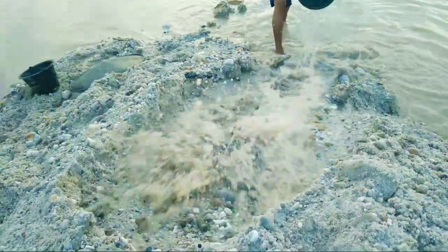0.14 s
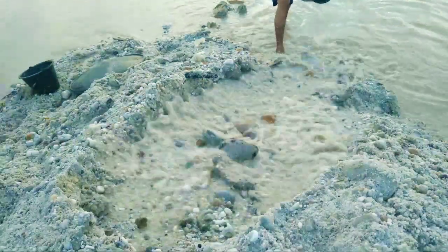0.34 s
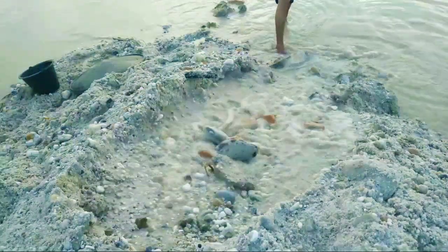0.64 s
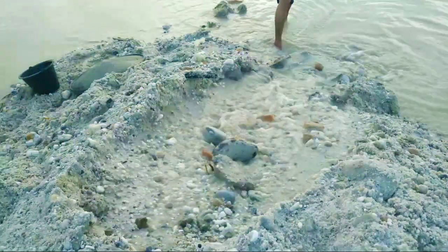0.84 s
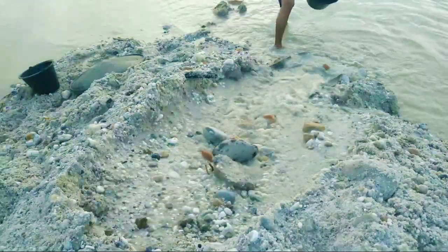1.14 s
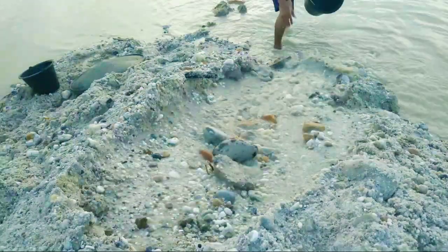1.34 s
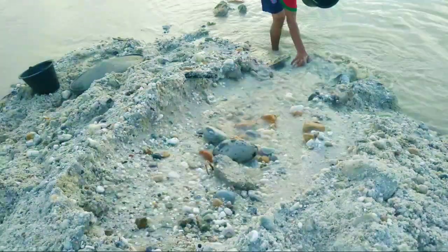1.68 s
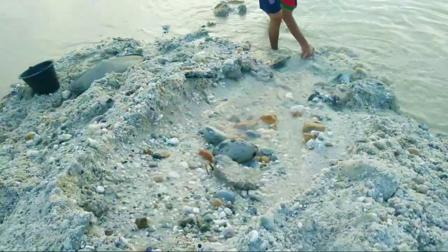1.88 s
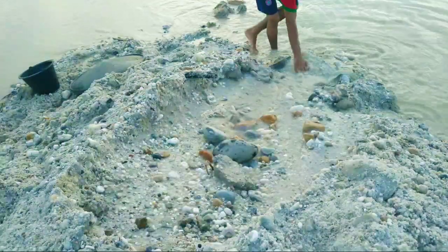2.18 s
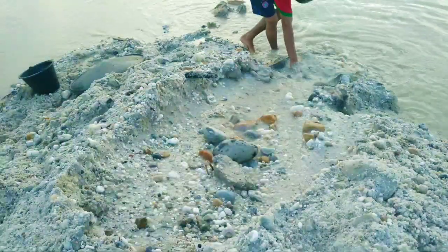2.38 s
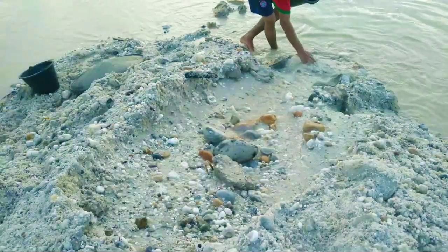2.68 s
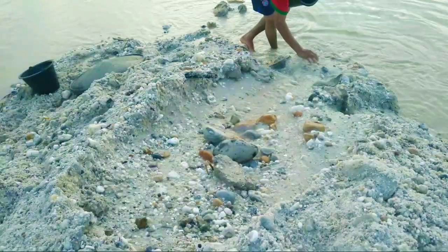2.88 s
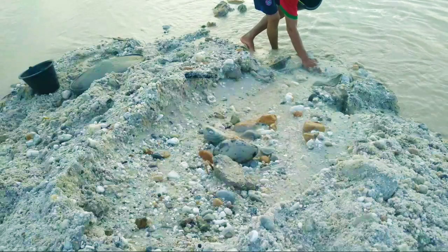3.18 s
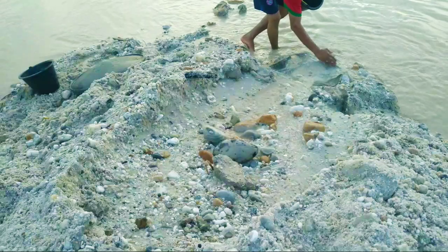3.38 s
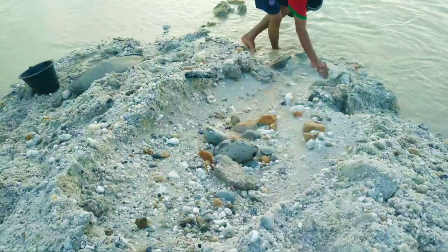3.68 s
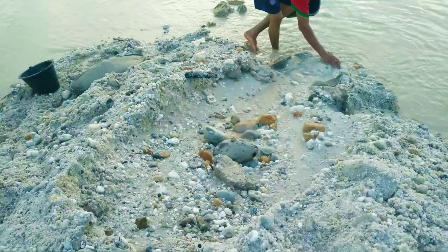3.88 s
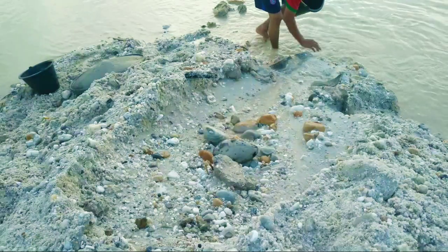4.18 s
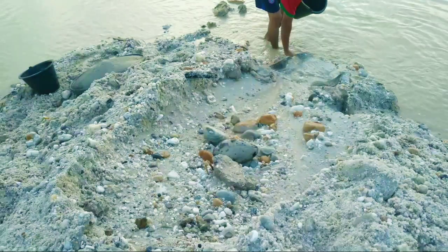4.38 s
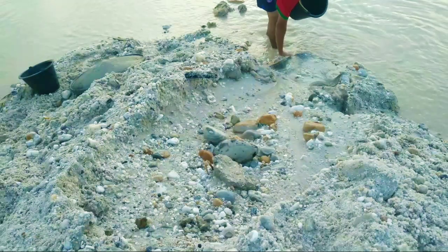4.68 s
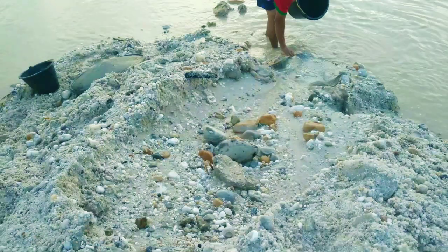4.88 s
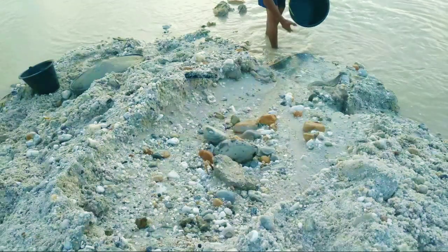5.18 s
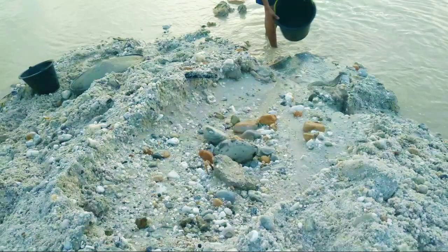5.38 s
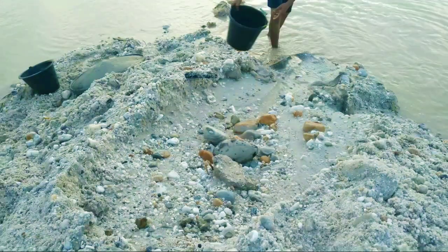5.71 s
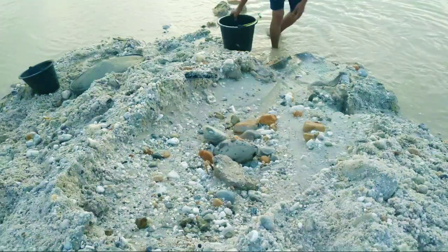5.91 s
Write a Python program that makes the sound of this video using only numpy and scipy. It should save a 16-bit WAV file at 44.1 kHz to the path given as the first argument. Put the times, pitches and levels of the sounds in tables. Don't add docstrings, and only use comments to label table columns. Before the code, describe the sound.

Bright splash on pebbles, trickling and small bubbles, scattered grit clicks, far-off engine blips throughout, and finally a hollow bucket knocking and crunching on stones.

```python
import sys
import numpy as np
from scipy import signal
from scipy.io import wavfile
from scipy.ndimage import uniform_filter1d

SR = 44100
rng = np.random.default_rng(int(sys.argv[2]) if len(sys.argv) > 2 else 0)


def undo_db(level):
    steps = np.asarray(level, float) / 20
    return 10 ** steps


def to_wav(sig):
    pcm = np.clip(np.atleast_2d(sig), -1, 1) * 32767
    pcm = np.round(pcm).astype(np.int16)
    wavfile.write(sys.argv[1], SR, pcm.T)


N = 266804
STEP = 32

# t/s, spray level/dB, coarse patter over the spray/dB
SPLASH = [
    (0.0, -20, -14),
    (0.01, -21, -8.5),
    (0.18, -24, -26),
    (0.3, -43.5, -7),
    (0.34, -39.5, -18),
    (0.4, -49.5, -12),
    (.6, -66, -10),
    (1.2, -110, -10),
]
SPLASH_TOP_DB = 2.5
# f/Hz, density level/dB per Hz
FINE_SPECTRUM = [(2500, -39.5), (3600, -22), (4700, -15), (5400, -6.5), (7000, -4.5), (8500, 3),
                 (9600, -5.5), (11000, -10.5), (14600, -15.5), (15800, -23)]
# f/Hz, density level/dB per Hz
COARSE_SPECTRUM = [(880, -12), (1500, -1), (3300, -3.5), (3620, -5.5), (3950, -5), (4720, -10),
                   (5500, -13.5), (7150, -65), (12100, -120)]
# t/s, flow level/dB
FLOW = [(0, -51), (.45, -51), (.72, -54.5), (1.3, -53), (1.7, -49.5), (2.11, -51), (2.66, -60.5),
        (3.2, -66), (3.8, -69), (4.5, -76), (5.55, -88), (5.7, -95), (5.8, -60), (6.05, -64)]
FLOW_COARSE_DB, FLOW_TOP_DB = -10.5, .1
FLOW_GURGLE_DB, GURGLE_PER_FLOW = -67, .9
# peak t/s, level/dB, 20 dB fade t/s, coarse part/dB, top octave/dB
STIRS = [(1.48, -46, .2, -12, 0), (1.63, -48, .2, -4, 0), (2.04, -46, .2, -16, 0), (2.83, -53, .2, -13, 0),
         (3.02, -60, .3, -15, 0), (3.25, -53.5, .15, -40, -10), (3.35, -52, .1, -8, -15),
         (3.41, -41, .13, -22, -24), (3.86, -41, .1, -23, -5), (3.9, -40, .12, -23, -5),
         (4.55, -43, .075, -25, -3), (5.945, -44, .08, -19, -8)]
# peak t/s, level/dB, 20 dB fade t/s, coarse part/dB, top octave/dB
CRUNCHES = [
    (5.64, -41, .03, 4, -4),
    (5.66, -48, .3, -24, -4),
    (5.735, -44, .05, -3, -4),
    (5.75, -36.5, .14, -17, -4),
]
STIR_RISE, CRUNCH_RISE = .5, .12

# t/s, peak level/dB, f/Hz, left over
# right/dB
TICKS = [(0.2645, -22.5, 6900, -17.5), (0.3168, -22, 7000, -9), (0.875, -33.5, 8200, -4.5),
         (1.456, -29, 8100, 5.5), (1.632, -20, 7700, -4), (1.71, -26, 7300, -7), (1.8205, -27, 7140, -11),
         (1.928, -27.5, 5870, -3.5), (2.036, -21, 8610, 4), (2.09, -30.5, 7810, -2.5),
         (2.5053, -30.5, 6960, -5.5), (2.732, -28, 7900, 1), (3.023, -30.5, 8690, 7),
         (3.244, -29.5, 8140, 8.5), (3.3333, -40, 8000, 4), (3.315, -40, 8290, 3), (3.364, -31, 7900, 2.0),
         (3.395, -32, 7800, -2), (3.6596, -41, 8080, -7), (3.8501, -25, 8600, 2), (4.52, -44, 8300, 2),
         (4.5466, -23, 8650, 3), (5.6374, -11.5, 8215, 0), (5.7354, -16, 8700, -1.5),
         (5.7923, -26, 8500, 1.5), (5.9389, -21, 8500, -0.5),
         (0.0624, -11, 8800, -2.5),
    (0.1366, -9, 8800, -3.5),
    (0.185, -16.5, 8180, -4.5),
]
# t/s, peak level/dB, f/Hz, bandwidth/Hz
KNOCKS = [(.0165, -8, 1050, 500), (.0167, -11, 2900, 1800), (.046, -26, 1300, 600), (.233, -36, 950, 150),
          (.245, -36, 1650, 200), (.283, -33, 1200, 300), (.366, -43, 1260, 200), (.423, -46, 899, 150),
          (1.296, -49, 1500, 150), (1.403, -39, 587, 80), (1.606, -33, 1600, 700), (1.632, -28, 1500, 500),
          (1.66, -36, 850, 100), (1.715, -39, 1550, 150), (1.75, -38, 830, 70), (1.817, -41, 694, 80),
          (1.86, -40, 760, 70), (1.904, -43, 791, 90), (1.945, -40, 902, 90), (2.053, -46, 1210, 120),
          (2.504, -48, 900, 150), (2.733, -48, 1500, 300), (2.811, -42, 1900, 400), (4.132, -56, 2000, 800),
          (5.552, -52, 640, 60), (5.555, -52, 1800, 150), (5.636, -24, 1550, 250), (5.647, -20, 1050, 130),
          (5.656, -27, 1180, 180), (5.729, -21, 2060, 200), (5.73, -24, 1350, 250), (5.737, -18, 1320, 150),
          (5.748, -23, 1400, 200), (5.754, -28, 1300, 200), (5.761, -23, 1900, 180), (5.832, -45, 1350, 80),
          (5.908, -40, 1800, 120), (5.92, -44, 800, 120), (5.929, -43, 720, 90), (5.815, -44, 1600, 250),
          (5.8, -40, 720, 90), (5.741, -27, 800, 200), (5.765, -30, 750, 150), (5.66, -36, 750, 60),
          (5.93, -50, 1850, 150), (5.948, -46, 980, 120), (5.948, -44, 330, 60), (6.03, -48, 330, 40)]
# t/s, peak level/dB, f/Hz
BUBBLES = [(.205, -33, 923), (.274, -47, 824), (.391, -46, 860), (.504, -46.5, 897), (.885, -48.5, 980),
           (1.357, -44, 880), (1.427, -32, 930), (1.57, -43, 900), (1.585, -40, 680), (1.6, -38, 900),
           (1.633, -23, 980), (1.69, -38, 960), (1.796, -45, 1080), (1.842, -39, 800), (1.933, -42.5, 1650),
           (2.194, -38.5, 808), (2.212, -30.5, 940), (2.257, -46, 1065), (2.477, -46, 897),
           (2.686, -45, 844), (2.84, -45.5, 600), (3.398, -33.5, 2350), (3.726, -51, 625),
           (3.844, -49.5, 1144), (3.855, -43, 2020), (5.549, -48.5, 1360)]
RING_CYCLES, RING_DB_PER_DB = 34, -.15
# t/s, length t/s, level/dB, centre f/Hz, bandwidth/Hz
SCUFFS = [(0.015, 0.006, -30, 6000, 8000), (1.6325, .003, -36, 6000, 11000),
          (3.022, .003, -46, 10000, 11000), (3.243, .004, -49, 9000, 9000), (3.333, .004, -46, 6000, 5000),
          (5.947, .004, -44, 5500, 3000), (.205, .006, -40, 2500, 3500), (3.352, .03, -44, 7500, 4000),
          (3.402, .005, -32, 8000, 2500), (3.835, .03, -42, 7500, 4000), (3.871, .005, -33, 7600, 2500),
          (3.89, .012, -35, 8000, 4000), (3.983, .004, -50, 8000, 7000), (1.454, 0.058, -41, 6600, 2430),
          (2.035, 0.033, -35, 8450, 1440), (2.802, 0.048, -44, 6800, 1900), (3.025, .06, -65, 13600, 3000),
          (3.391, 0.011, -34, 7650, 2460), (4.153, 0.041, -61, 3600, 5000), (4.736, 0.02, -64, 9360, 3000),
          (2.96, 0.063, -57.5, 4200, 5860), (4.313, 0.018, -66, 1200, 300),
          (3.728, 0.027, -58.5, 2480, 2970), (5.532, 0.038, -54.5, 2500, 4460)]

# peak t/s, level/dB, 20 dB rise t/s, 20 dB fade t/s
SLOSHES = [(.012, -27, .04, .13), (.2, -47, .2, .5), (.28, -38.5, .02, .1), (.5, -57, .3, 1.5),
           (1.44, -39.5, .17, .17), (1.645, -37, .09, .06), (1.69, -38, .06, .3), (1.86, -46, .2, .1),
           (1.94, -51, .05, .8), (2.85, -54, .16, .13), (3.37, -64.5, .17, .17), (3.72, -55, .02, .25),
           (4.16, -70, .1, .25), (5.56, -57, .025, .05), (5.93, -57, .06, .07)]
# f/Hz, density level/dB per Hz
SLOSH_SPECTRUM = [(240, -18), (400, 1), (731, 2), (797, 9), (977, 8), (1180, 6), (1660, 3), (2600, -1),
                  (3380, -30), (5720, -120)]

# t/s, peak level/dB, tub f/Hz, rim click over the boom/dB, grit over the boom/dB
BUMPS = [(5.635, -21.5, 427, -3, -21), (5.64, -15.5, 361.6, -9, -9), (5.646, -26.5, 270, 0, 1),
         (5.654, -24, 303, -5, -21), (5.667, -43, 328, 4, -12), (5.721, -32, 250, -40, -40),
         (5.728, -8, 359, -14, -25.5), (5.7375, -8, 343.7, -16, -21), (5.749, -17, 345, -12, -12),
         (5.7605, -7, 326.6, -20, -15), (5.777, -39, 262, -28, -9), (5.794, -31.5, 269, -30, -5),
         (5.811, -29.5, 344, -15, -21.5), (5.831, -27.5, 324, -11, -19), (5.852, -35, 361, -18, -15),
         (5.909, -63.5, 250, 14, 7.5), (5.924, -52, 259, -5, -12)]
# share of tub f, bandwidth/Hz, level/dB
TUB_MODES = [(0.85, 12, -9), (1, 20.9, -14)]
# f/Hz, bandwidth/Hz, level/dB
RIM_MODES = [(756, 150, -6), (1080, 140, -1), (1344, 270, 8), (1820, 280, 2.5)]

# t/s, firing rate/Hz
FIRING_RATE = [(0, 26.86), (.45, 20.55), (.83, 24.05), (1.27, 17.09), (1.57, 15.59), (2.06, 21.3),
               (2.35, 17.91), (2.66, 25.35), (3.03, 19.92), (3.25, 28.26), (3.74, 16.82), (4.2, 25.91),
               (4.47, 26.27), (4.89, 23.06), (4.9, 26.09), (5.25, 20.38), (5.6, 16.2), (6.05, 13.95)]
FIRST_TURN = .383
# start t/s, length t/s, boom at opening/dB, boom at closing/dB, upper modes over the boom/dB
BLIPS = [(-.05, .38, -34, -39, -13), (.48, .05, -36, -35, -17), (.53, .12, -32, -29.5, -13),
         (.66, .28, -34, -37, -13), (1.12, .2, -46, -43, -13), (1.47, .3, -36.5, -34, -13),
         (1.77, .33, -35, -33.5, -13), (2.28, .08, -45, -43, -13), (2.385, .16, -33, -31.5, -16),
         (2.62, .23, -31, -36.5, -10), (3.01, .04, -35, -33, -11), (3.06, .16, -29, -33, -12),
         (3.26, .09, -41, -43, -1), (3.38, .25, -42, -46, -15), (3.8, .16, -32, -36, -12),
         (3.97, .46, -36, -33, -14), (4.43, .33, -33, -37, -14), (4.76, .34, -37, -41.5, -16),
         (5.23, .11, -39, -44, -11), (5.5, .6, -44, -47, -13)]
IDLE_DB, IDLE_SHARP_DB, OPEN_DB_PER_S, SHUT_DB_PER_S = -49, -15, 400, 150
SHARP_PER_BOOM = .3
# f/Hz, bandwidth/Hz, level/dB
BOOM_MODES = [(54, 6, -31), (150, 19, 0), (182, 22, -12)]
# f/Hz, bandwidth/Hz, level/dB
BARK_MODES = [(325, 36, 5), (305, 20, -6), (445, 40, -7)]
BOOM_RISE_S, BARK_RISE_S = .012, .0052
GLIDE, GLIDE_S = .42, .011
UNEVEN_DB, WANDER = 1.4, .015
PAN_DB, PAN_PER_BOOM, DRIFT_DB_PER_S = -3.3, .25, 1.1

# f/Hz, density level/dB per Hz
HISS_SPECTRUM = [(400, -6), (1050, -9), (1350, 1), (1900, -13), (2750, -10), (3400, -16), (4400, -18),
                 (5500, -16), (7200, -15), (7900, -1), (8350, 0), (8800, -11), (11300, -22), (15700, -26)]
HISS_DB = -64.5
# peak t/s, level/dB, 20 dB fade t/s
GUSTS = [
    (.1, -51, 1),
    (.68, -52, .25),
    (.89, -51, .15),
    (1.77, -52, .4),
    (2.46, -48, .3),
    (2.6, -51, .9),
    (3.2, -45, .2),
    (4.0, -48, .2),
    (4.41, -44, .2),
    (5.66, -44, .2),
]
CALM_DB, GUST_RISE = -62, .7
# f/Hz, density level/dB per Hz
RUMBLE_SPECTRUM = [(15, -23.5), (25, -18), (46, -10.5), (81, -14), (100, -9), (130, -27.5), (220, -120)]


def spray():
    level, low, top = map(spread, grit_levels())
    fine = colour(patchy(patter(3500, 4.0, 0.54), 2.0, bins=15, frames=3.6), FINE_SPECTRUM)
    body = signal.oaconvolve(fine, signal.firwin(63, 11000, fs=SR)[None], "same")
    top_octave = fine - body
    coarse = undo_db(5.0) * colour(patchy(patter(1200, 3.6, 0.8), 2.1), COARSE_SPECTRUM)
    return undo_db(-0.68) * flicker(90, 0.78) * (level * body + top * top_octave + low * coarse)


def grit_levels():
    splash_db, coarse_db = curves(SPLASH)
    flow = undo_db(curves(FLOW)[0])
    parts = [(undo_db(splash_db), coarse_db, SPLASH_TOP_DB), (flow, FLOW_COARSE_DB, FLOW_TOP_DB)]
    for rows, share in ((STIRS, STIR_RISE), (CRUNCHES, CRUNCH_RISE)):
        for s, db, fade, low_db, top_db in rows:
            parts.append((swells([(s, db, share * fade, fade)]), low_db, top_db))
    fine = sum(level ** 2 for level, low_db, top_db in parts)
    coarse = sum((level * undo_db(low_db)) ** 2 for level, low_db, top_db in parts)
    top = sum((level * undo_db(top_db)) ** 2 for level, low_db, top_db in parts)
    return [np.sqrt(power) for power in (fine, coarse, top)]


def patter(per_s, spread_db, smooth):
    hits = (evened(clicks(per_s, spread_db, channels=3)) + smooth) * rng.standard_normal((3, N))
    placed = sum(ports(row, lag) for row, lag in zip(hits, (-7, -5, 1)))
    return placed + 0.85 * rng.standard_normal((2, N))


def drops():
    out = np.zeros((2, N))
    t = np.arange(300) / SR
    for s, db, hz, pan_db in TICKS:
        tick = ring([(hz, 800, 0), (8400, 1200, -5)], 300 / SR)
        tick = tick * (1 - np.exp(-t / .00028)) ** 2
        add(out, s, ports(undo_db(db + 14.0) * tick, -3.5, pan_db))
    t = np.arange(round(.05 * SR)) / SR
    for s, db, hz, width in KNOCKS:
        knock = ring([(hz, width, db + 3.0)], .05) * (1 - np.exp(-t * hz / .6))
        add(out, s, ports(knock, -4 * (s < 5), -1.1))
    for s, db, hz in BUBBLES:
        t60 = RING_CYCLES / hz * undo_db(RING_DB_PER_DB * (db + 42))
        pop = undo_db(db + 9.1) * bubble(hz * .98, max(t60, .01), .1)
        add(out, s, ports(pop, -5, -1.55))
    noises = rng.standard_normal((len(SCUFFS), 2, 4000))
    for (s, length, db, hz, width), noise in zip(SCUFFS, noises):
        edges = np.clip([hz - width / 2, hz + width / 2], 400, 16000)
        grit = signal.lfilter(*signal.butter(2, edges, "band", fs=SR), noise * abs(noise))
        grit = grit[:, :round(length * SR)]
        add(out, s, undo_db(db) * evened(grit) * signal.windows.tukey(grit.shape[1], .7))
    return out


def bubble(hz, t60, rise=.25):
    t = np.arange(round(t60 * SR) + 9) / SR
    envelope = undo_db(-60 * t / t60) * (1 - np.exp(-t / 0.0031))
    return envelope * np.sin(2 * np.pi * hz * t * (1 + rise * t / t60))


def gurgle():
    crowd = np.zeros((2, N))
    shapes = rng.random((24, 2))
    for hz, (long, side) in zip(np.geomspace(480, 2300, 24), shapes):
        train = clicks(60, 2.4, channels=1)[0]
        grain = bubble(hz, (12 + 24 * long) / hz)
        voice = signal.oaconvolve(train, grain / np.linalg.norm(grain))[:N]
        crowd += ports(voice, -7.5, 5 * (side - .7))
    wash = patchy(patter(600, 3.4, 0.74), 2.7, bins=5.7)
    flow_db = np.minimum(curves(FLOW)[0], -56)
    bed = undo_db(FLOW_GURGLE_DB + GURGLE_PER_FLOW * (flow_db + 56))
    level = undo_db(-1.5) * spread(np.hypot(bed, swells(SLOSHES)))
    return level * (colour(crowd, SLOSH_SPECTRUM) * .87 + colour(wash, SLOSH_SPECTRUM) * .2)


def bucket():
    out = np.zeros(N)
    t = np.arange(2000) / SR
    noises = rng.standard_normal((len(BUMPS), 2000))
    grit = signal.lfilter(*signal.butter(2, [1800, 7000], "band", fs=SR), noises)
    tune = rng.standard_normal((len(BUMPS), len(RIM_MODES)))
    contact = np.sin(np.pi * np.minimum(t / .0125, 1)) ** 0.7
    for (s, db, tub_hz, rim_db, grit_db), noise, spot in zip(BUMPS, grit, tune):
        rim_modes = [(hz, width, level_db + 4 * d) for (hz, width, level_db), d in zip(RIM_MODES, spot)]
        tub_modes = [(share * tub_hz, width, level_db) for share, width, level_db in TUB_MODES]
        free = ring(tub_modes, 2000 / SR) * (1 - np.exp(-t / 0.003))
        tub = contact * np.sin(2 * np.pi * tub_hz * t) + free
        rim = ring(rim_modes, 2000 / SR) * (1 - np.exp(-t / 0.0013))
        crush = undo_db(grit_db) * noise * np.exp(-t / 0.0042)
        add(out, s, undo_db(db) * (0.6 * tub + undo_db(rim_db - 4) * rim + crush))
    return ports(out, 0, -1.6)


def engine():
    turns = np.cumsum(spread(curves(FIRING_RATE)[0])) / SR - FIRST_TURN
    times = np.interp(np.arange(np.ceil(turns[-1])), turns, np.arange(N) / SR)
    chance = rng.standard_normal((len(times), 3))
    level_db, sharp_db = throttle(times + 0.013)
    heat = 1 + .011 * (1 / np.gradient(times) - 22)
    t = np.arange(round(.15 * SR)) / SR
    climb = t - GLIDE * GLIDE_S * (1 - np.exp(-t / GLIDE_S))
    pipe = np.zeros(N)
    for s, db, upper_db, warm, (late, strong, sharp) in zip(times, level_db, sharp_db, heat, chance):
        warm = warm * (1 + WANDER * late)
        boom = ring([(hz * warm, width, mode_db) for hz, width, mode_db in BOOM_MODES], .15)
        boom = boom * (1 - np.exp(-t / BOOM_RISE_S)) ** 2
        bark = np.zeros(len(t))
        for hz, width, mode_db in BARK_MODES:
            decay = undo_db(mode_db) * np.exp(-np.pi * width * t)
            bark += decay * np.sin(2 * np.pi * hz * warm * climb)
        bark = bark * (1 - np.exp(-t / BARK_RISE_S)) ** 2
        puff = undo_db(14.5 + UNEVEN_DB * strong) * boom + undo_db(upper_db + 14.0 + 2.4 * sharp) * bark
        add(pipe, max(s - .002 + .001 * late, 0), undo_db(db) * puff)
    pipe = signal.sosfilt(signal.butter(5, 520, fs=SR, output="sos"), pipe)
    t = np.arange(round(.3 * SR)) / SR
    banks = rng.standard_normal((2, len(t))) * undo_db(-60 * t / 0.36) * (t > .008)
    far = signal.oaconvolve(pipe[None], banks / np.linalg.norm(banks[0]), axes=1)[:, :N]
    now = slow_time()
    pan_db = PAN_DB + PAN_PER_BOOM * (throttle(now)[0] + 40) + DRIFT_DB_PER_S * now
    pan_db = spread(uniform_filter1d(pan_db, size=280))
    left = np.interp(np.arange(N) - 8 - pan_db, np.arange(N), pipe)
    return np.array([left * undo_db(pan_db / 2), pipe / undo_db(pan_db / 2)]) + 0.23 * far


def throttle(t):
    level_db, sharp_db = np.full(len(t), IDLE_DB), np.full(len(t), IDLE_SHARP_DB)
    for start, length, open_db, shut_db, upper_db in BLIPS:
        end = start + length
        held_db = np.interp(t, [start, end], [open_db, shut_db])
        edges_db = OPEN_DB_PER_S * np.maximum(start - t, 0) + SHUT_DB_PER_S * np.maximum(t - end, 0)
        blip_db = held_db - edges_db
        sharp_db = np.where(blip_db > level_db, upper_db, sharp_db)
        level_db = np.maximum(level_db, blip_db)
    return level_db, sharp_db + SHARP_PER_BOOM * (level_db + 35)


def air():
    own, far = rng.standard_normal((2, N)), rng.standard_normal(N)
    low = signal.lfilter(*signal.butter(2, 2200, fs=SR), .85 * ports(far, 17) + .5 * own)
    high = signal.lfilter(*signal.butter(2, 2200, "high", fs=SR), own)
    hiss = colour(patchy(low + high, 1.8, bins=5.5, frames=4.5), HISS_SPECTRUM)
    hiss = undo_db(HISS_DB - 0.5) * hiss * flicker(300, .9)
    gusts = swells([(s, db, GUST_RISE * fade, fade) for s, db, fade in GUSTS])
    wind = spread(np.hypot(undo_db(CALM_DB), gusts))
    gust = rng.standard_normal((3, N))
    rumble = colour(gust[0] + 0.62 * gust[1:], RUMBLE_SPECTRUM)
    return hiss + undo_db(-3.5) * wind * rumble * flicker(2500, 2.5)


def ring(modes, length=.2):
    t = np.arange(round(length * SR)) / SR
    return sum(undo_db(db) * np.exp(-np.pi * width * t) * np.sin(2 * np.pi * hz * t) for hz, width, db in modes)


def clicks(per_s, spread_db, channels):
    count = int(per_s * N / SR)
    out = np.zeros((channels, N))
    place = rng.integers(0, N, (channels, count))
    size = rng.exponential(1, (channels, count))
    np.put_along_axis(out, place, undo_db(spread_db * np.minimum(size, 5)), 1)
    return out


def ports(x, lag, pan_db=0):
    return np.array([np.roll(x, lag), x]) * undo_db([[pan_db / 2], [-pan_db / 2]])


def colour(x, points):
    f, db = np.transpose(points)
    hz = abs(np.fft.fftfreq(8192, 1 / SR))
    log_gain = np.interp(np.log(hz + 1), np.log(f + 1), db, -90, -90) * np.log(10) / 20
    taps = np.fft.ifft(np.exp(np.conj(signal.hilbert(log_gain)))).real[:4096]
    return evened(signal.oaconvolve(x, taps[None], axes=1)[:, :N])


def patchy(x, db, bins=9, frames=5):
    z = signal.stft(x, nperseg=256)[2]
    field = uniform_filter1d(rng.standard_normal(z.shape[1:]), int(bins), 0)
    field = uniform_filter1d(field, int(frames), 1)
    return evened(signal.istft(z * undo_db(db * evened(field)), nperseg=256)[1][:, :N])


def flicker(samples, db):
    wobble = uniform_filter1d(rng.standard_normal(N), samples)
    return undo_db(db * evened(uniform_filter1d(wobble, samples)))


def swells(rows):
    t = slow_time()
    power = 0
    for s, db, rise, fade in rows:
        below_db = 20 * np.where(t < s, (s - t) / rise, (t - s) / fade)
        power = power + undo_db(db - below_db) ** 2
    return np.sqrt(power)


def evened(x):
    return x / np.sqrt(np.mean(x ** 2) + 1e-20)


def slow_time():
    return np.arange(0, N + STEP, STEP) / SR


def curves(rows):
    s, *columns = np.transpose(rows)
    return [np.interp(slow_time(), s, c) for c in columns]


def spread(control):
    return np.interp(np.arange(N) / SR, slow_time(), control)


def add(mix, s, sound):
    part = mix[..., round(s * SR):][..., :sound.shape[-1]]
    part += sound[..., :part.shape[-1]]


def scene():
    near = drops() + bucket()
    t = np.arange(3000) / SR
    scatter = rng.standard_normal((2, 3000)) * undo_db(-60 * t / .06) * (t > .002)
    scatter = scatter / np.linalg.norm(scatter[0])
    scatter = signal.lfilter(*signal.butter(2, 1500, "high", fs=SR), scatter)
    wet = signal.oaconvolve(near, scatter, axes=1)[:, :N]
    return near + undo_db(-6.5) * wet + spray() + gurgle() + engine() + air()


def roll_off(x):
    return signal.sosfilt(signal.butter(12, 15830, fs=SR, output="sos"), x)


def record(dry):
    cut = signal.sosfilt(signal.butter(3, 42, "high", fs=SR, output="sos"), dry)
    cut = signal.oaconvolve(cut, signal.firwin(255, 15750, fs=SR)[None], "same")
    return roll_off(cut)


dry = scene()
out = record(dry)
to_wav(out)
```